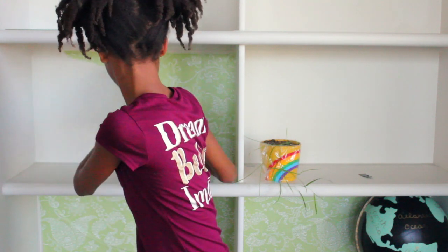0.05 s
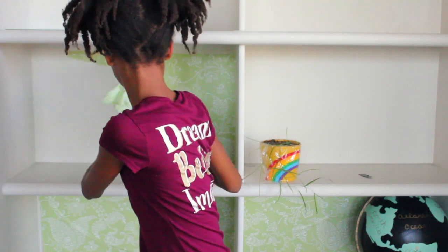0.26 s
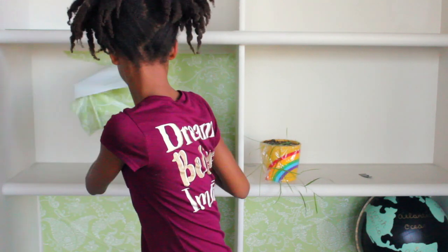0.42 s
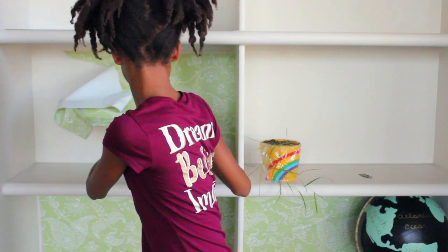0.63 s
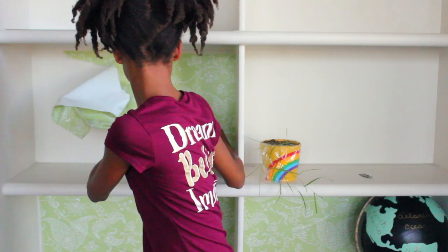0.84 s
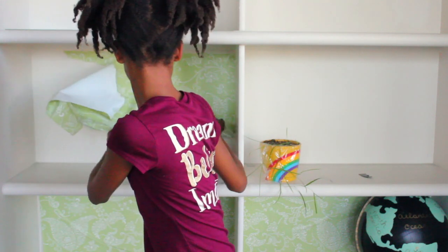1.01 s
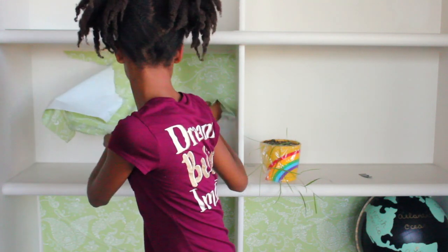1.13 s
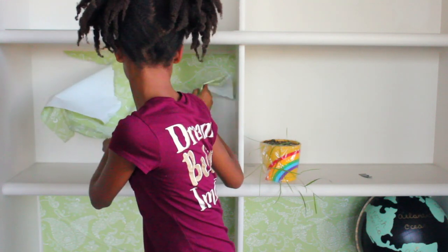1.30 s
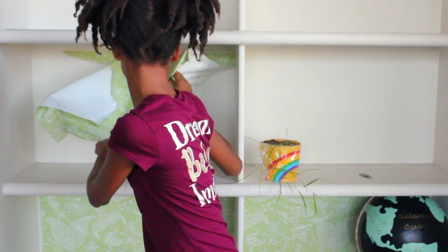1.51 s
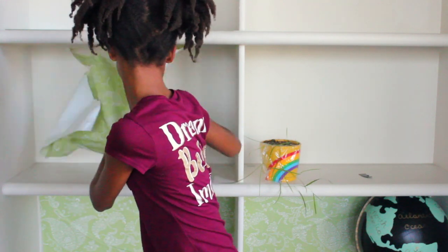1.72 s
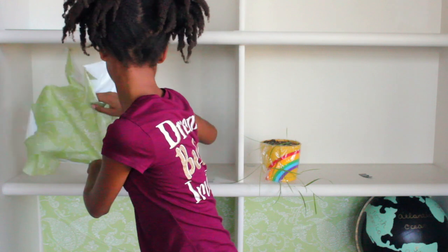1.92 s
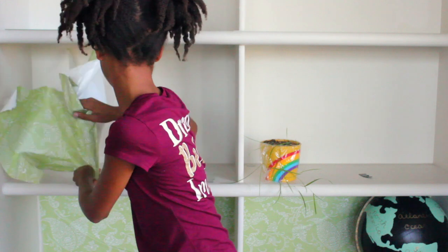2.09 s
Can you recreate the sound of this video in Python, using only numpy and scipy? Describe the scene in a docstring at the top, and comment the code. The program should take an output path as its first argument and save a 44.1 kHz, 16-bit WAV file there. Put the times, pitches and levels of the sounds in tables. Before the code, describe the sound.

Sticky paper liner peels off a shelf panel, starting with faint ticks and swelling into loud crackling at about 0.2 seconds. The ripping continues in uneven jerks, with sharp snaps, rattling paper and light drumming from the thin board. It stops around 1.7 seconds, leaving a faint rustle, and one short, quieter rip comes near 2.1 seconds. The sound is close, in a small room.

```python
"""In a small room, sticky paper liner is pulled off the back panel of a shelf compartment.
The glue fails by stick and slip, in thousands of tiny snaps a second and in sudden jerks. These drive
the loose sheet, which rattles, and the thin panel, which drums. Friction makes the sheet sing and the
panel groan; creases crack and hands bump the shelf. The pull ends, the sheet swings and gives one
last rip. Resonances and short reflections of the compartment and the room colour the sound."""
import sys
import numpy as np
from scipy import signal
from scipy.fft import rfft, irfft
from scipy.io import wavfile
from scipy.ndimage import uniform_filter1d, map_coordinates

SR = 44100
rng = np.random.default_rng(int(sys.argv[2]) if len(sys.argv) > 2 else 0)


def wrap_up_sound(samples):
    """Save the sound to the file named by the first command line argument, as 16-bit audio."""
    columns = np.atleast_2d(samples).T
    # keep every value between -1 and 1, then stretch to whole-number steps
    tamed = np.clip(columns, -1, 1)
    steps = np.round(tamed * 32767).astype(np.int16)
    wavfile.write(sys.argv[1], SR, steps)


N = 94815
T = np.arange(N) / SR

# Levels in all tables are relative; later gains and filters act on them.
# a patch of glue gives way at once: t/s, crackle level/dB, panel thump level/dB, decay time/s
JERKS = [(0.13, -28.5, -60, 0.0043), (0.206, -30, -48, .012), (0.25, -21, -33, 0.017),
         (0.444, -16, -59, 0.0079), (0.470, -10.5, -33.5, 0.0042), (0.5314, -12, -37, 0.011),
         (0.564, -14, -25, 0.013), (0.606, -13, -32, 0.0079), (0.745, -12, -35, 0.0064),
         (0.777, -14.5, -41, 0.031), (0.872, -21.5, -21, 0.011), (0.879, -13.5, -34, 0.013),
         (0.949, -14, -52, 0.01), (0.977, -13, -51, 0.025), (1.321, -17.5, -34.5, 0.012),
         (1.361, -20, -39, 0.004), (1.428, -20.5, -45, 0.0044), (1.547, -30, -48, 0.024),
         (1.612, -25.5, -54, 0.039), (1.676, -15, -58, 0.0046), (2.071, -31.5, -62, 0.012),
         (2.082, -25.5, -47.5, 0.036)]


def from_db(db):
    """Amplitude ratio of a level in decibels."""
    return 10 ** (np.asarray(db) / 20)


def rms_one(x):
    """Normalisation to unit root-mean-square amplitude."""
    return x / np.sqrt(np.mean(x ** 2) + 1e-20)


def evened(x):
    """Division by the running RMS holds the level steady over about a hundredth of a second."""
    return x / np.sqrt(np.abs(uniform_filter1d(x ** 2, size=400)) + 1e-6)


def envelope(curve):
    """Amplitude envelope interpolated through points of t/s, level/dB."""
    return from_db(np.interp(T, *np.transpose(curve)))


def jerk_shape(start_s, decay_s, rise_s=.001):
    """Envelope of a damped transient: a linear rise and an exponential decay."""
    age = np.maximum(T - start_s, 0)
    return np.minimum(age / rise_s, 1) * np.exp(-age / decay_s)


def swell(centre_s, db, half_width_s):
    """Gaussian envelope: a smooth rise and fall."""
    return from_db(db) * np.exp(-.5 * ((T - centre_s) / half_width_s) ** 2)


def coloured(x, spectrum):
    """Zero-phase filtering by a curve of f/Hz, level/dB."""
    hz, db = np.transpose(spectrum)
    bins = np.maximum(np.fft.rfftfreq(2 * N, 1 / SR), 1)
    gain = from_db(np.interp(np.log(bins), np.log(hz), db))
    return irfft(rfft(x, 2 * N) * gain)[:N]


def noise(spectrum):
    """Spectrally shaped Gaussian noise of unit RMS."""
    return rms_one(coloured(rng.standard_normal(N), spectrum))


def resonator(x, hz, width_hz):
    """A damped second-order resonance with unit gain at its peak."""
    r = np.exp(-np.pi * width_hz / SR)
    feedback = [1, -2 * r * np.cos(2 * np.pi * hz / SR), r * r]
    return signal.lfilter([1, 0, -1], feedback, x) * (1 - r * r) / 2


def snaps(spectrum, per_s, spread_db, clump_db, clumps_per_s):
    """Shot noise of unit RMS: random impulses whose sizes are bunched by stick and slip."""
    born = rng.random(N) < per_s / SR
    size_db = spread_db * np.minimum(rng.exponential(1, N), 4)
    size_db += clump_db * np.interp(T * clumps_per_s, np.arange(N), rng.standard_normal(N))
    impulses = born * from_db(size_db) * rng.choice([-1, 1], N)
    return rms_one(coloured(impulses, spectrum))


def rubbed(notes, width_hz):
    """Frictional excitation: noise drives one narrow resonance for the length of each note."""
    friction = rng.standard_normal(N)
    out = np.zeros(N)
    for s, db, half_width_s, hz in notes:
        band = resonator(resonator(friction, hz, width_hz), hz, width_hz)
        out += swell(s, db, half_width_s) * rms_one(band)
    return out


def peeling():
    """Adhesive fracture: glue threads snap densely along the peel line, and in bursts at each jerk."""
    # envelopes of the fine crackle and of the treble fizz of the finest snaps: t/s, level/dB
    crackle_levels = [(0.0, -53), (0.03, -61), (0.08, -43.5), (0.11, -46), (0.14, -32.5), (0.2, -39),
                      (0.21, -26), (0.23, -30), (0.26, -16.5), (0.29, -16.5), (0.41, -24), (0.48, -22.5),
                      (0.54, -21.5), (0.68, -24), (0.78, -23), (0.87, -24), (0.887, -17), (0.93, -24),
                      (0.99, -18.5), (1.04, -19), (1.08, -14.5), (1.1, -19), (1.17, -17), (1.3, -25),
                      (1.38, -14), (1.42, -23), (1.44, -15.5), (1.45, -26.5), (1.51, -27.5), (1.55, -18),
                      (1.58, -23), (1.62, -17), (1.69, -16.5), (1.75, -44), (1.95, -61), (2.05, -63.5),
                      (2.085, -33.5), (2.15, -38)]
    fizz_levels = [(0.0, -69), (0.17, -53.5), (0.2, -61), (0.21, -43), (0.28, -25), (0.41, -36.5),
                   (0.62, -29.5), (0.67, -37), (0.738, -37), (0.748, -33), (0.8, -32.5), (0.87, -45),
                   (0.89, -66), (0.94, -45), (0.96, -32.5), (1.14, -28.5), (1.29, -37.5), (1.38, -30),
                   (1.53, -43.5), (1.56, -34.5), (1.59, -38.5), (1.68, -29), (1.71, -37), (1.75, -66),
                   (1.86, -69), (1.88, -46.5), (1.94, -91), (2.04, -83), (2.09, -33), (2.15, -50.5)]
    # spectra of the crackle, the fizz and the jerks: f/Hz, level/dB
    crackle_spectrum = [(500, -96), (1100, -20.5), (1600, -3), (2500, 0), (3600, -1), (5200, -4),
                        (6500, -6), (8000, -14), (11000, -26.5), (16000, -58)]
    fizz_spectrum = [(3000, -16), (5500, -10.5), (7500, -3.5), (10000, -6.5), (13000, -10), (16000, -22)]
    jerk_spectrum = [(60, -80), (200, -61), (500, -19), (900, -1), (1500, 5), (2600, 1), (5000, 2),
                     (8000, -13), (12000, -17.5), (16000, -47)]
    crackle = evened(snaps(crackle_spectrum, per_s=2200, spread_db=3.5, clump_db=1.2, clumps_per_s=430))
    fizz = evened(snaps(fizz_spectrum, per_s=4000, spread_db=5, clump_db=.5, clumps_per_s=350))
    tearing = evened(snaps(jerk_spectrum, per_s=6000, spread_db=2.5, clump_db=.2, clumps_per_s=500))
    bursts = sum(from_db(db) * jerk_shape(s, decay_s) for s, db, _, decay_s in JERKS)
    return (envelope(crackle_levels) * from_db(-1) * crackle
            + envelope(fizz_levels) * from_db(.5) * fizz
            + bursts * tearing)


def loose_sheet():
    """Forced vibration: the freed paper rattles coarsely as the glue snaps."""
    # envelope of the rattle: t/s, level/dB
    levels = [(0.0, -61), (0.13, -60), (0.17, -34.5), (0.2, -60), (0.21, -22.5), (0.24, -23.5),
              (0.26, -15.5), (0.33, -16.5), (0.42, -26), (0.53, -43.5), (0.53, -21.5), (0.57, -22.5),
              (0.68, -35.5), (0.735, -40), (0.81, -17.5), (0.86, -76), (0.88, -32.5), (0.9, -20.5),
              (0.95, -38), (1.02, -19.5), (1.04, -19), (1.09, -22), (1.11, -24), (1.21, -26), (1.3, -41),
              (1.39, -27.5), (1.41, -27), (1.44, -30), (1.49, -40), (1.66, -19.5), (1.69, -33.5),
              (1.76, -88), (1.83, -46), (1.93, -68), (1.99, -46), (2.05, -54), (2.1, -37.5), (2.15, -64)]
    # spectrum of the rattle: f/Hz, level/dB
    spectrum = [(60, -75), (200, -54), (450, -34), (650, -8.5), (900, 0.5), (1300, -1), (1700, -3),
                (2400, -12), (5000, -23), (16000, -50)]
    rattle = evened(snaps(spectrum, per_s=2600, spread_db=1.8, clump_db=.8, clumps_per_s=200))
    return envelope(levels) * from_db(-4.5) * rattle


def back_panel():
    """Plate vibration: the thin board drums under the pull, and its damped modes thump at each jerk."""
    # envelope of the drumming: t/s, level/dB
    levels = [(0.0, -58), (0.19, -50), (0.29, -22.5), (0.34, -36.5), (0.41, -46), (0.48, -49), (0.51, -64),
              (0.53, -34), (0.58, -25), (0.59, -47), (0.62, -28.5), (0.68, -51), (0.72, -57), (0.75, -35.5),
              (0.86, -49.5), (0.87, -47), (0.88, -22.5), (0.97, -38.5), (1.0, -25), (1.08, -48),
              (1.18, -50), (1.31, -38), (1.39, -24.5), (1.46, -43), (1.52, -47), (1.63, -34), (1.71, -57),
              (1.74, -83), (1.78, -48.5), (1.93, -76), (1.98, -46.5), (2.04, -54.5), (2.11, -47),
              (2.15, -38.5)]
    # spectrum of the drumming: f/Hz, level/dB
    spectrum = [(25, -63), (50, -54), (95, -47), (125, -25.5), (200, -18), (270, -12), (330, -4.5),
                (420, 3), (540, 4.5), (750, -0.5), (1500, -16), (16000, -77)]
    # low modes of the panel: f/Hz, level/dB
    modes = [(279, -9), (385, -2), (450, -6), (540, -4)]
    thumps = sum(from_db(db + mode_db) * jerk_shape(s, decay_s) * np.sin(2 * np.pi * hz * (T - s))
                 for s, _, db, decay_s in JERKS for hz, mode_db in modes)
    drumming = snaps(spectrum, per_s=1500, spread_db=1.5, clump_db=1.2, clumps_per_s=120)
    return envelope(levels) * from_db(-3.5) * drumming + thumps


def room_noise():
    """Stationary noise: the faint background of the quiet room."""
    # spectrum of the background: f/Hz, level/dB
    spectrum = [(25, 6), (70, -4), (140, -1), (350, 9), (1000, -19), (2500, 14), (6000, -51),
                (16000, -28)]
    return from_db(-62) * noise(spectrum)


def sheet_chirps():
    """Friction-driven resonance: the taut sheet or a fold sings briefly near one pitch."""
    # chirps of the sheet: t/s, level/dB, half width/s, f/Hz
    chirps = [(0.085, -50, 0.012, 2400), (0.138, -29.5, 0.005, 2740), (0.168, -42, 0.031, 2370),
              (0.29, -25.5, 0.024, 1560), (0.575, -28.5, 0.087, 1380), (1.2, -26.5, 0.04, 1260),
              (1.375, -24, 0.022, 2015), (1.697, -24, 0.016, 1580), (1.78, -44.5, 0.018, 2410),
              (1.805, -29.5, 0.0028, 2460)]
    return rubbed(chirps, width_hz=420)


def hand_bumps():
    """Soft impact: hands meet the shelf gently and excite mainly low frequencies."""
    # contacts with the shelf: t/s, level/dB, half width/s
    bumps = [(0.19, -48, 0.054), (0.29, -48, 0.02), (0.75, -47, 0.016), (1.785, -60, 0.007)]
    # spectrum of a contact: f/Hz, level/dB
    spectrum = [(25, -30), (70, -16), (110, 2), (180, -5), (270, -1), (400, -4.5), (900, -33),
                (16000, -113)]
    return sum(swell(*bump) for bump in bumps) * noise(spectrum)


def cracks():
    """Buckling and fracture: a crease or a lump of glue gives one sharp click, then splinters."""
    # single cracks: t/s, peak level/dB
    events = [(0.2642, -5), (0.291, 2.5), (0.47, -6), (0.502, -4), (0.566, -22), (0.725, -3), (0.778, -12),
              (0.8744, -8), (0.886, -10.5), (0.981, -9), (1.019, -16), (1.087, 0), (1.141, -4), (1.681, -8),
              (2.086, -26)]
    # spectrum of a crack: f/Hz, level/dB
    spectrum = [(150, -55), (1200, -3), (5000, 0), (8000, -9), (16000, -22)]
    click = coloured(signal.unit_impulse(N, N // 2), spectrum)
    click /= click.max()
    splinters = from_db(-13) * noise(spectrum)
    out = np.zeros(N)
    for s, db in events:
        crack = np.roll(click, int(s * SR) - N // 2) + splinters * jerk_shape(s, decay_s=.002)
        out += from_db(db) * crack
    return out


def panel_groans():
    """Friction-driven resonance: a steady pull makes the panel groan on one low note."""
    # groans of the panel: t/s, level/dB, half width/s, f/Hz
    groans = [(0.29, -29.5, 0.018, 275), (1.175, -32.5, 0.057, 425), (1.39, -26, 0.01, 387)]
    return rubbed(groans, width_hz=79)


def echo_pattern(echoes_per_s=4000, compartment_t60_s=.048, room_delay_s=.01):
    """Impulse response: quick echoes in the compartment, then the room's short reverberation."""
    # reverberation by band: lower f/Hz, upper f/Hz, level/dB, T60/s
    room_bands = [(60, 1220, -6, 0.17), (1190, 6160, -5, 0.26), (6230, 14700, -9, 0.14)]
    t = T[:SR // 2]
    echoes = rng.standard_normal(len(t)) * (rng.random(len(t)) < echoes_per_s / SR)
    response = from_db(-1) * rms_one(echoes * from_db(-60 * t / compartment_t60_s))
    for low_hz, high_hz, db, t60_s in room_bands:
        tail = rms_one(rng.standard_normal(len(t)) * (t > room_delay_s) * from_db(-60 * t / t60_s))
        band = signal.butter(4, [low_hz, high_hz], "band", fs=SR, output="sos")
        response += from_db(db) * signal.sosfilt(band, tail)
    return response / np.sqrt(len(t))


def reflections(x, spots=16, spot_s=.012):
    """Echo paths depend on source position: the sound fades from spot to spot along the peel line."""
    moments = np.arange(int(N / SR / spot_s) + 2)
    active_spot = rng.permutation(spots)[moments % spots]
    shares = [np.sin(np.pi / 2 * np.interp(T / spot_s, moments, active_spot == k)) for k in range(spots)]
    return sum(signal.fftconvolve(x * share, echo_pattern())[:N] for share in shares)


def shelf_resonance(x):
    """Resonance: the panel and the compartment lift a few narrow bands."""
    # modes of panel and compartment: f/Hz, bandwidth/Hz, boost/dB
    modes = [(279, 18, 5), (410, 45, 2), (809, 13, 10), (928, 35, 3), (1217, 45, 5), (1883, 22, 3),
             (2002, 20, 4), (2352, 40, 2.5), (2655, 60, 2)]
    return x + sum((from_db(db) - 1) * resonator(x, hz, width_hz) for hz, width_hz, db in modes)


def scene():
    """Superposition in stereo: interaural time and level cues put the paper slightly left of centre."""
    # the peel line travels along the shelf: t/s, right ear's lag/s, side level/dB
    travel = [(0, .000016, 3.5), (.25, 0.000026, -0.5), (.45, 0.000016, 2.5), (.7, 0.000016, 2.5),
              (.9, 0.000011, 4), (1.4, 0.000011, 5), (1.68, 0.000025, 4.5), (1.8, 0.000023, -3.5),
              (2.15, 0.000016, 5)]
    # share of the diffuse sound that differs between the ears: f/Hz, level/dB
    side_spectrum = [(30, -5), (100, -9), (300, -15), (700, -10.5), (1400, -16), (2800, -14), (5600, -6),
                     (9000, -1.5), (14000, -4.5)]
    friction = sheet_chirps() + panel_groans()
    direct = from_db(-3) * (peeling() + cracks() + loose_sheet() + friction + back_panel() + hand_bumps())
    room_mid, room_side = room_noise(), room_noise()
    s, lag_s, side_db = np.transpose(travel)
    mid = shelf_resonance(direct + reflections(direct)) + room_mid
    side_gain = from_db(np.interp(T, s, side_db))
    side = coloured(reflections(direct) * side_gain + room_side, side_spectrum)
    left = from_db(.43) * (mid + side)
    delayed_samples = (T - np.interp(T, s, lag_s)) * SR
    right = map_coordinates(mid - side, [delayed_samples], order=3, mode="nearest")
    return np.array([left, right])


def record(dry):
    """Band limiting: the microphone drops the bass, peaks are clipped and the top is cut."""
    low_cut = signal.butter(2, 218, "high", fs=SR, output="sos")
    top_cut = signal.ellip(10, .1, 90, 15300, fs=SR, output="sos")
    thin = signal.sosfilt(low_cut, dry)
    return signal.sosfilt(top_cut, np.clip(thin, -.95, .95))


dry = scene()
out = record(dry)
wrap_up_sound(out)
```